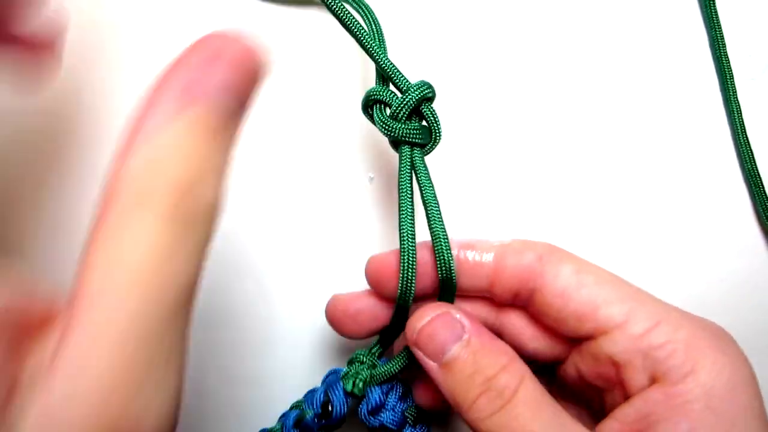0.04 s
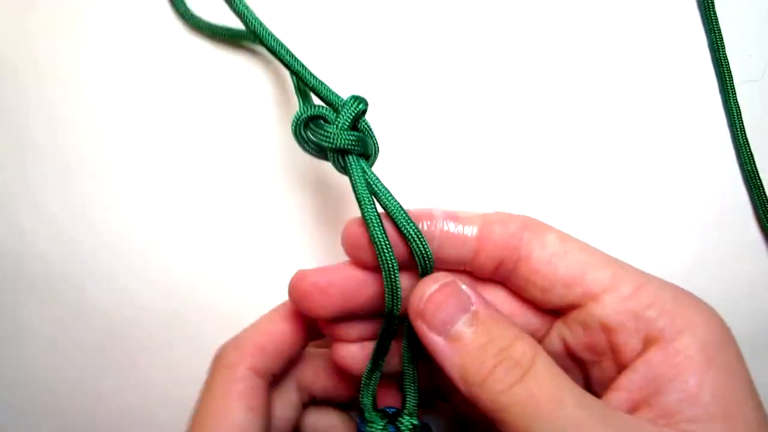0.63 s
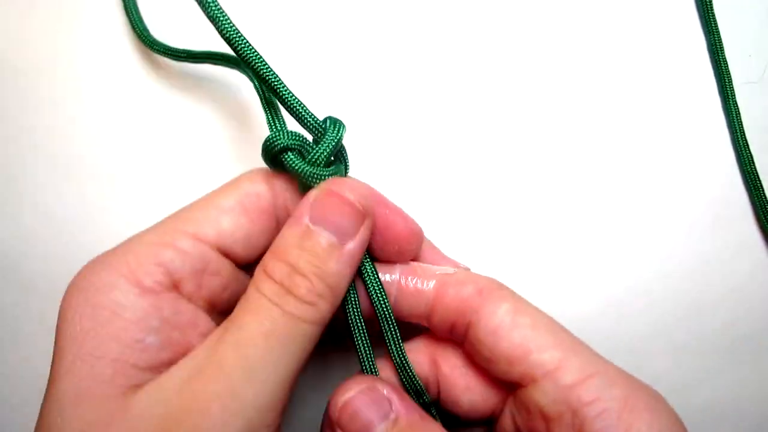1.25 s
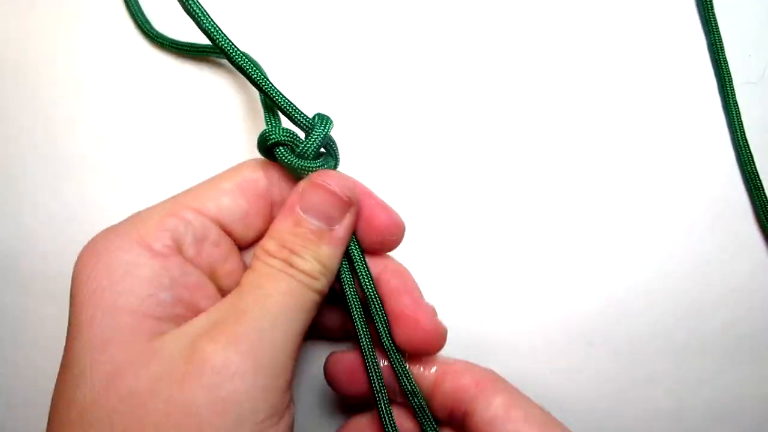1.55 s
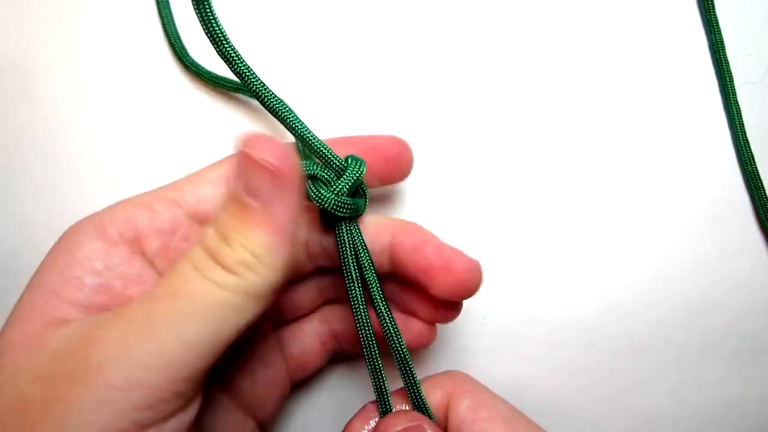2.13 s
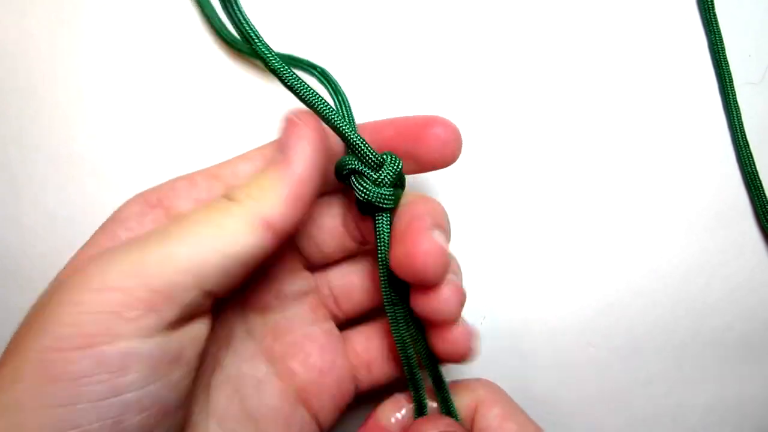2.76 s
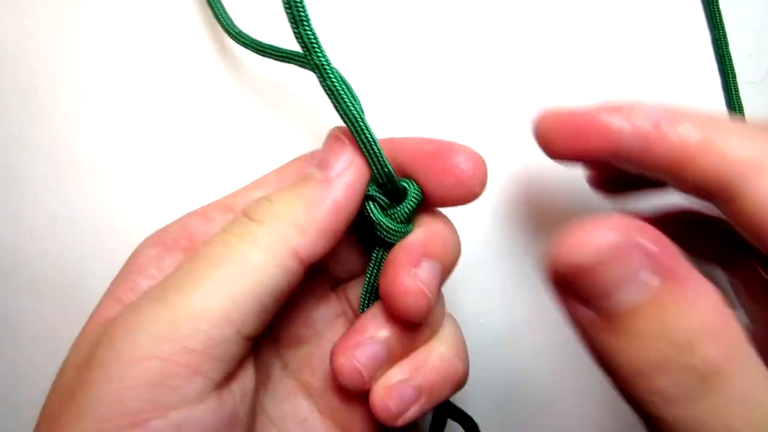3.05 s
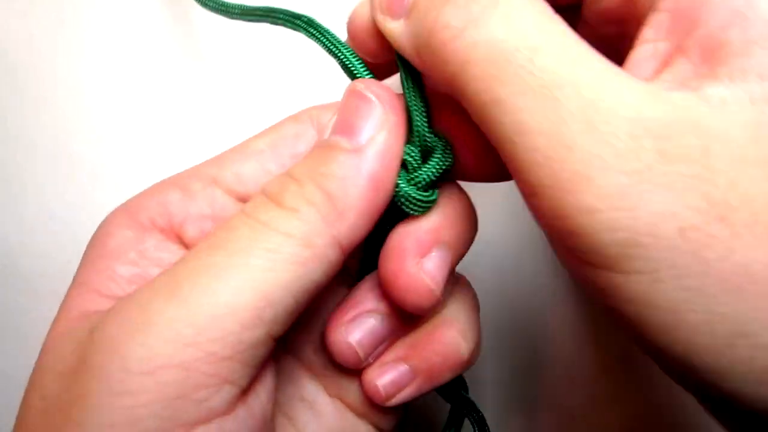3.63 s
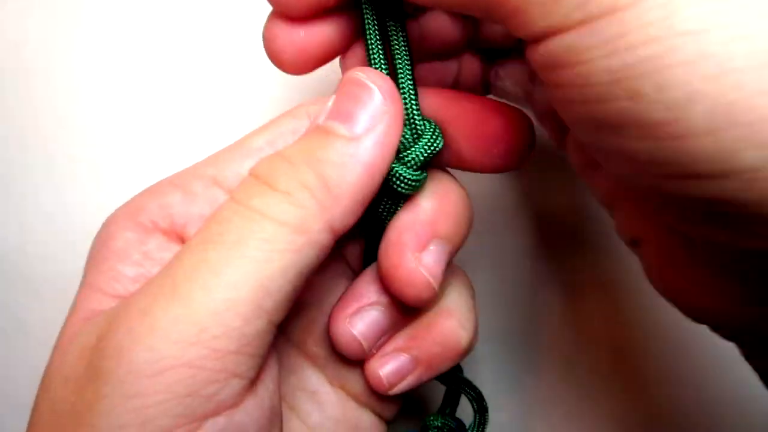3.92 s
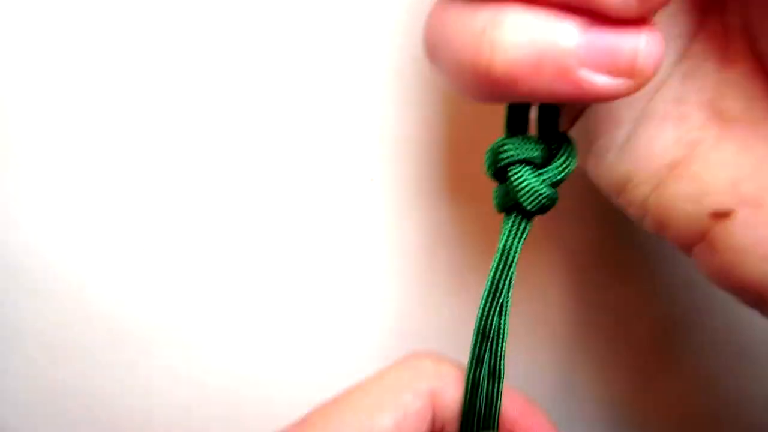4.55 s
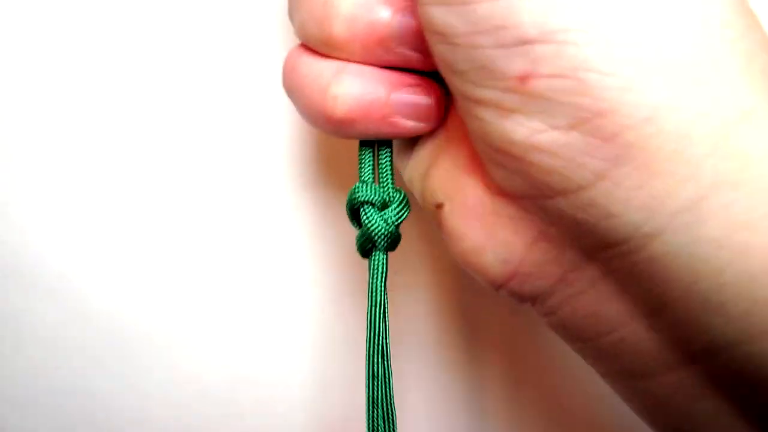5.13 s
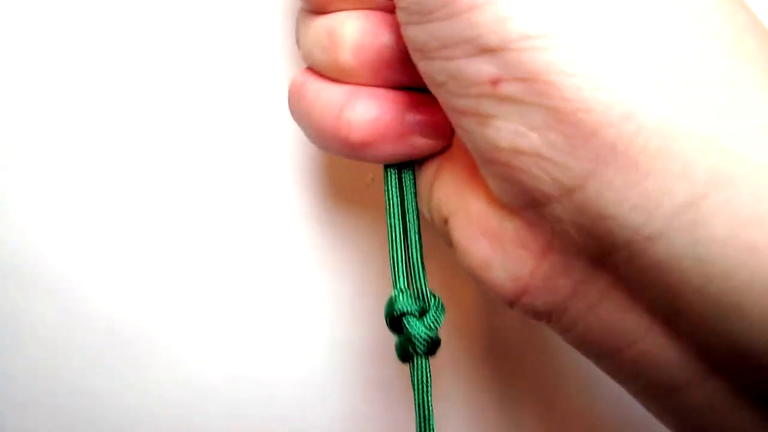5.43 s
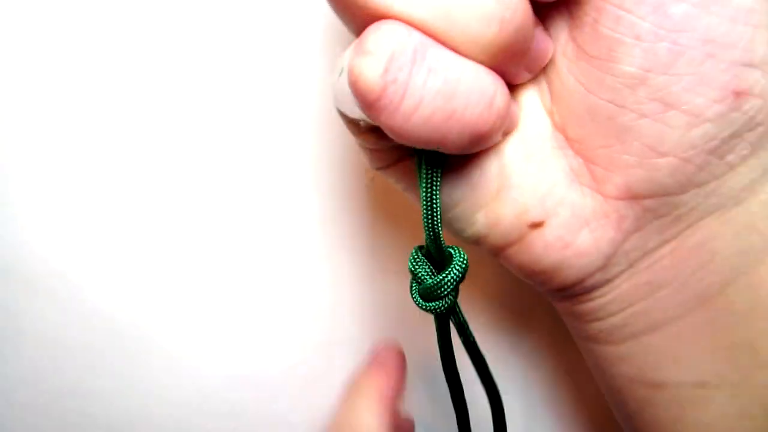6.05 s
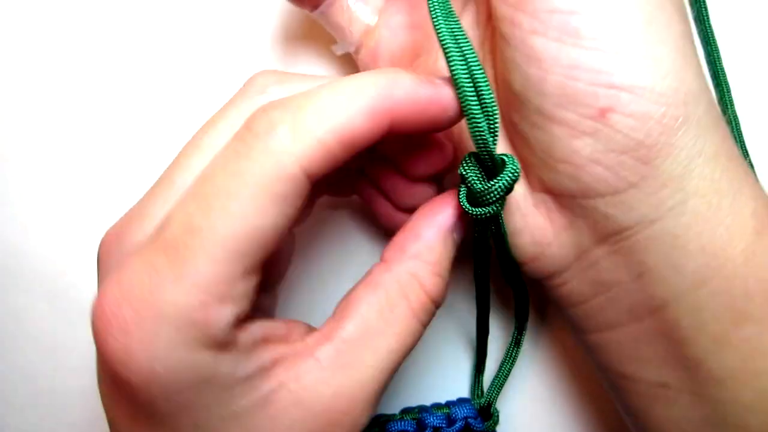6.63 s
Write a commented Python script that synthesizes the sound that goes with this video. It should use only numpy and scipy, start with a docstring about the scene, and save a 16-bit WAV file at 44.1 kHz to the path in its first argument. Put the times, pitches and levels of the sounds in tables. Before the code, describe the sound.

Close, scratchy rustles and small clicks as hands pull a cord knot tight, with a few dull knocks and a faint indoor hum.

```python
"""A dry, close rasp comes in short strokes: two hands draw nylon cord through a knot and pull it tight.
The braid's fibres catch and slip over skin and over each other, fingernails tick, and the taut cord
jumps in the knot with tiny plucks. The hands bump the desk, which knocks and rings, and shake the
stand of a small camera into a low shudder. Behind it a small room hums and a distant motor swells."""
import sys
import numpy as np
from scipy import signal
from scipy.fft import rfft, irfft
from scipy.io import wavfile
from scipy.ndimage import uniform_filter1d

SR = 44100
rng = np.random.default_rng(int(sys.argv[2]) if len(sys.argv) > 2 else 0)


def wav_record(signal):
    """Record a signal, one row per channel, as 16-bit PCM in the file named by sys.argv[1]."""
    frames = np.transpose(np.atleast_2d(signal))
    bounded = np.clip(frames, -1, 1)
    # unit amplitude maps onto the largest positive 16-bit level
    quanta = np.round(bounded * 32767).astype(np.int16)
    wavfile.write(sys.argv[1], SR, quanta)


N = 303404
TIME = np.arange(N) / SR
BINS = np.fft.rfftfreq(N, 1 / SR)


def amp(db):
    """Decibels to gain."""
    return 10 ** (np.asarray(db) / 20)


def unit(x):
    """Scales to rms 1."""
    return x / np.sqrt(np.mean(x ** 2) + 1e-20)


def curve_db(points, hz):
    """Reads an EQ curve on a log-frequency axis."""
    point_hz, db = np.transpose(points)
    return np.interp(np.log(hz + 1), np.log(point_hz), db)


def colour(x, gain):
    """Filters with one gain for each frequency bin."""
    return irfft(rfft(x) * gain, N)


def noise(gain):
    """White noise through an EQ."""
    return colour(rng.standard_normal(N), gain)


def band(lo_hz, hi_hz):
    """Band-pass gain with soft edges."""
    return 1 / np.sqrt((1 + (lo_hz / (BINS + 1)) ** 12) * (1 + (BINS / hi_hz) ** 12))


def wander(hz):
    """Smooth random modulation, rms 1, up to about hz changes a second."""
    return unit(noise(np.exp(-(BINS / hz) ** 2)))


def add(mix, start_s, sound):
    """Mixes a sound in at start_s, or at zero if that is negative."""
    part = mix[max(round(start_s * SR), 0):][:len(sound)]
    part += sound[:len(part)]


def reflections(x, t60):
    """A small furnished room: sparse echoes of random sign that die quickly."""
    t = np.arange(SR // 3) / SR
    taps = rng.standard_normal(len(t)) * (rng.random(len(t)) < .06)
    taps *= (t > .002) * amp(-60 * t / t60)
    return signal.fftconvolve(x, taps / np.linalg.norm(taps))[:N]


# EQ of the room tone: (frequency [Hz], relative level [dB])
AIR_EQ = [(18, -44), (30, 1.5), (44, -13), (130, -11), (182, -23.5), (230, -27.5), (270, -25), (369, -29.5),
          (505, -34.5), (622, -37.5), (897, -33), (1330, -34), (1870, -44), (7460, -48), (15500, -52.5)]


def room_air(level_db=-61):
    """Bass-heavy room air and microphone hiss; the level is that of the part above 300 Hz."""
    air = noise(amp(curve_db(AIR_EQ, BINS)) * BINS / np.hypot(BINS, 15))
    return amp(level_db) * air / np.std(colour(air, band(300, 15500)))


def tone(hz, drift_hz=0.477, waver_db=2.0):
    """A sine that wavers a little in pitch and level."""
    phase = 2 * np.pi * np.cumsum(hz + drift_hz * wander(1.77)) / SR
    return np.sqrt(2) * np.sin(phase) * amp(waver_db * wander(2.84))


# partials of the hum: (frequency [Hz], level [dB])
HUM_TONES = [(53.8, -48), (119, -57), (211, -68), (226.1, -62.5), (360.7, -73.5), (570.6, -77.5),
             (672.9, -80), (899, -77)]


def appliance_hum():
    """An appliance lays a steady bed of low tones."""
    return sum(amp(db) * tone(hz) for hz, db in HUM_TONES)


# partials of the motor: (frequency [Hz], relative level [dB], mid fade-in [s], mid fade-out [s])
MOTOR_TONES = [(82.4, -42.5, 1.8, 5.64), (112.4, -48, 2.2, 8), (143.8, -52.5, 3.2, 8), (64.6, -46, 6.1, 8),
               (158, -56, 5.7, 8)]


def motor_drone(start_db=-20.5, rise_db_per_s=3, fade_s=0.86):
    """A distant motor: its tones fade in one by one and the drone grows louder."""
    drone = np.zeros(N)
    for hz, db, start, end in MOTOR_TONES:
        fade = np.clip(np.minimum(TIME - start, end - TIME) / fade_s + .5, 0, 1)
        drone += amp(db) * tone(hz) * fade
    return drone * amp(start_db + rise_db_per_s * TIME)


def traffic_swell(level_db=-61, band_hz=(270, 430), fade_in_s=(5.5, 6.2)):
    """Near the end a soft, diffuse low-mid swell rises, as of traffic passing outside."""
    return amp(level_db) * unit(noise(band(*band_hz))) * np.interp(TIME, fade_in_s, [0, 1])


# the stand's slow sway, then its quick shudder: (frequency [Hz], half-width [Hz])
STAND_MODES = [(12.44, 4.77), (27.8, 5)]
# hands leaning on the desk rock the stand: (time [s], length [s], sway [dB], shudder [dB])
NUDGES = [(0.378, 0.034, -27, -22), (0.587, 0.046, -49, -31), (1.015, 0.21, -49, -43.5),
          (1.487, 0.15, -50, -34), (2.494, 0.2, -34, -32), (2.698, 0.32, -24.5, -43.5),
          (3.25, 0.34, -33, -58), (4.586, 0.39, -35, -44), (5.117, 0.19, -27, -26), (5.31, 0.23, -21, -41),
          (5.82, 0.26, -27.5, -28.5)]


def camera_stand(rise_s=0.041, decay_s=0.086, lifted_s=(3.2, 5.1)):
    """The stand trembles on two low resonances; each nudge builds up, holds and dies away."""
    resting_db, lifted_trim_db = (-38, -43), (-3, -5.5)  # (sway, shudder): calmer with hands lifted
    lifted = uniform_filter1d(1. * ((TIME > lifted_s[0]) & (TIME < lifted_s[1])), SR // 10)
    out = np.zeros(N)
    for mode, (hz, width) in enumerate(STAND_MODES):
        power = amp(resting_db[mode] + lifted_trim_db[mode] * lifted) ** 2
        for start, length, *mode_db in NUDGES:
            attack = np.clip((TIME - start) / rise_s, 0, 1)
            release = np.exp(-np.maximum(TIME - start - length, 0) / decay_s)
            power += (amp(mode_db[mode]) * attack * release) ** 2
        rocking = signal.hilbert(noise(1 / (1 + ((BINS - hz) / width) ** 4)))
        energy = abs(rocking) ** 2
        levelled = rocking.real / np.sqrt(energy + 0.09 * energy.mean())  # the nudges set the dynamics
        out += np.sqrt(power) * unit(levelled)
    return out


# resonances of the desk top: (frequency [Hz], relative level [dB], t60 [s])
DESK_MODES = [(72, -16.5, 0.87), (95.7, 2, 0.11), (127.1, 4, 0.11), (153, 3.5, 0.13), (218.4, 8, 0.031),
              (263.6, -2.5, 0.056), (407, -9, 0.061), (500, -13.5, 0.051), (607, -22.5, 0.13),
              (854, -20.5, 0.11), (1305, -4.5, 0.024), (2380, -20, .02)]
# hands bumping the desk: (time [s], peak level [dB], contact time [ms])
BUMPS = [(.128, -28.5, 5.4), (0.254, -28.5, 0.89), (0.3647, -19.5, 0.23), (0.489, -29, 0.65),
         (0.66, -39, 1.8), (0.934, -27, 4), (1.071, -27.5, 8.2), (1.366, -29.5, 3.7), (2.778, -32, 2.3),
         (5.127, -20, 11.7), (5.833, -15, 0.72), (5.852, -23, 8.9), (6.1847, -16, 0.2),
         (6.2048, -21.5, 0.26), (6.2138, -15, 0.32), (6.235, -18.5, 0.23), (6.243, -33, 2.9)]


def desk_bumps(push_gain=2.37, push_s=0.00029, rattle_db=-15, rattle_s=0.012, bloom_s=0.0046):
    """A blow pushes the desk top and rings its modes; soft flesh stays longer and sounds duller."""
    out, t = np.zeros(N), np.arange(SR // 3) / SR
    push = push_gain * np.exp(-t / push_s)
    for start, db, contact_ms in BUMPS:
        ring = sum(amp(level - 60 * t / t60) * np.sin(2 * np.pi * hz * rng.normal(1, .02) * t)
                   for hz, level, t60 in DESK_MODES)
        ring *= 1 - np.exp(-t / bloom_s)
        rattle = amp(rattle_db) * rng.standard_normal(len(t)) * np.exp(-t / rattle_s)
        contact = 1000 * t / contact_ms
        force = contact * np.exp(-2 * contact)
        knock = signal.fftconvolve(ring + rattle + push, force)[:len(t)]
        add(out, start, amp(db) * knock / abs(knock).max())
    return out


# plucks in the knot: (time [s], pitch [Hz], peak level [dB], rise and decay time [s])
PLUCKS = [(2.411, 1400, -35, 0.00061), (4.526, 1380, -30.5, 0.0012), (5.133, 1395, -46, 0.0027),
          (5.266, 1200, -34, 0.0009)]


def knot_plucks():
    """The taut cord jumps in the knot and gives a tiny pitched pluck."""
    out, t = np.zeros(N), np.arange(SR // 20) / SR
    for start, hz, db, ring_s in PLUCKS:
        envelope = t / ring_s * np.exp(1 - t / ring_s)
        add(out, start, amp(db) * envelope * np.sin(2 * np.pi * hz * t))
    return out


# EQ of the braid, for its ticks and its rasp: (frequency [Hz], relative level [dB])
BRAID_EQ = [(350, 1), (700, -5), (1050, 6), (1380, 5.5), (1750, 0.5), (2450, 2), (4400, -1), (5600, -2.5),
            (7200, -2), (8700, -2.5), (9700, -13), (12000, -12.5), (15800, -15.5)]
# nail ticks and cord snaps: (time [s], relative level [dB], decay [s], tilt [dB per octave])
TICKS = [(0.0255, -40.5, 0.0028, 6), (0.142, -37, 0.0047, 1), (0.363, -38, 0.0089, -7.5),
         (0.656, -56, .004, -6), (1.38, -55, .003, 1), (1.993, -49, 0.01, -2.5), (2.1805, -36.5, 0.002, 7),
         (2.2817, -41, 0.0021, 2), (2.411, -35.5, 0.0036, 2.5), (2.689, -44, .002, 7),
         (2.869, -46.5, 0.01, -4.5), (3.0048, -39.5, 0.0021, 11), (3.43, -48, 0.0067, 4),
         (4.34, -39, 0.005, 9), (4.389, -51, 0.0055, -8), (4.407, -39.5, 0.011, -2.5),
         (4.4863, -42, .008, 10), (4.503, -35, 0.0057, 7), (4.9505, -37, 0.0074, 2),
         (5.129, -43.5, 0.02, -5), (5.2685, -39, 0.011, -10), (5.462, -46, 0.006, -4),
         (5.692, -31.5, 0.0027, -4.5), (5.8306, -31, 0.0053, 2), (5.8712, -35, 0.011, -22),
         (6.204, -26, 0.01, -12), (6.2134, -28.5, 0.0058, -5), (6.6362, -41, 0.0024, 2),
         (6.7, -45, 0.0072, 4)]


def nail_ticks(trim_db=-3.5):
    """A nail or a strand lets go: a burst that dies in milliseconds, coloured like the braid."""
    out, t = np.zeros(N), np.arange(4096) / SR
    hz = np.fft.rfftfreq(len(t), 1 / SR)
    octaves, low_cut = np.log2((hz + 200) / 4000), hz / (hz + 300)
    for start, db, decay_s, tilt_db in TICKS:
        spectrum = amp(curve_db(BRAID_EQ, hz) + tilt_db * octaves) * low_cut
        burst = unit(irfft(spectrum * np.exp(2j * np.pi * rng.random(len(hz)))))
        add(out, start, amp(db + trim_db) * burst * np.exp(-t / decay_s))
    return out


def fibre_slips(per_s=7000, spread_db=-0.5, clump_db=2.03, clump_hz=130, noise_gain=0.71):
    """Fibres catch and let go thousands of times a second, in clumps as the weave passes."""
    size = amp(spread_db * np.minimum(rng.exponential(1, N), 4))
    snaps = size * rng.choice([-1, 1], N) * (rng.random(N) < per_s / SR)
    friction = unit(snaps) + noise_gain * rng.standard_normal(N)
    return unit(friction * amp(clump_db * wander(clump_hz)))


def close_echo(delay_ms=1.053, gain=0.2):
    """Comb filter: one very short reflection ripples the spectrum about every kilohertz."""
    return 1 - gain * np.exp(-2j * np.pi * BINS * delay_ms / 1000)


def finger_hollow(x, strokes, log_width=.075, overtone=0.17, patch_db=2.0, patch_hz=150, patch_s=0.013):
    """The hollow between the fingers rings with its octave; shifting contact mottles the spectrum."""
    hz, t, frames = signal.stft(x, SR, nperseg=512, noverlap=384)
    start, length, peak, *_, hollow_hz, boost_db = np.transpose(strokes)
    peak_s = start + peak * length  # the hollow takes a new shape for each stroke
    ratio = (hz[:, None] + 1) / np.interp(t, peak_s, hollow_hz)
    ring = 1 / (1 + (np.log(ratio) / log_width) ** 2)  # flesh damps it: a broad peak
    ring += overtone / (1 + (np.log(ratio / 2) / log_width) ** 2)
    patches = rng.standard_normal(frames.shape)
    for axis, steps in enumerate([patch_hz / hz[1], patch_s / t[1]]):
        blur = np.expand_dims(signal.windows.gaussian(101, steps), 1 - axis)
        patches = signal.fftconvolve(patches, blur, "same", axes=axis)
    gain = amp(ring * np.interp(t, peak_s, boost_db) + patch_db * unit(patches))
    mids = (hz > 2000) & (hz < 6000)
    gain[mids] /= np.sqrt(np.mean(gain[mids] ** 2, axis=0))  # the ring gathers energy and adds none
    return signal.istft(frames * gain, SR, nperseg=512, noverlap=384)[1][:N]


def cord_speed(length_s, peak, spill):
    """Speed arches from 0 to 1 and back, overhanging each end of the stroke by the share spill."""
    progress = np.arange(-spill * length_s, (1 + spill) * length_s, 1 / SR) / length_s
    ramp = np.interp(progress, [-spill, np.clip(peak, .05, .95), 1 + spill], [0, 1, 0])
    return np.sin(np.pi / 2 * ramp)


# rubs and slides of the cord: (time [s], length [s], peak position [0-1], relative level [dB],
# grip rasp [dB], slide sheen [dB], finger hollow pitch [Hz], hollow emphasis [dB])
STROKES = [ (0.0, 0.1, 0, -57, 2, -27, 4700, 7), (.062, 0.13, 0.18, -48.5, -12, -18.5, 4600, 4),
           (.215, 0.065, 0.53, -48.5, -7.5, -9.5, 4900, -1), (0.255, .08, 0.58, -54.5, -7, -6, 4900, 5),
           (0.412, 0.044, 0.82, -61.5, 7, -0.5, 3830, -1), (0.548, 0.054, 0, -62, 7.5, -14, 3000, -2),
           (0.644, 0.051, 0.49, -46.5, -6, -16.5, 3000, -4), (0.695, 0.16, 0.06, -66, 6, -11, 2970, -5),
           (0.888, 0.17, 0.39, -63.5, -4, -3.5, 3720, 0), (1.005, 0.26, 0.22, -63.5, 5.5, -2, 2500, 7),
           (1.25, 0.049, 0.48, -54.5, 1, -17, 2400, 0), (1.297, 0.062, 0.23, -51, -6, -17, 2950, 6),
           (1.341, 0.069, 0.66, -47, 1, -9, 3630, 4), (1.412, 0.15, 0.14, -64.5, -1, -2, 3770, -1),
           (1.644, .11, 0, -57.5, 6, -19, 2500, 15), (1.896, 0.098, 0.54, -61, 4, -5, 4300, 4),
           (1.993, 0.053, 0, -53.5, -0.5, -16, 3200, -7), (2.039, 0.077, 0.41, -47, -3.5, -19, 3150, 4),
           (2.08, 0.21, 0.52, -57.5, 1.5, -16.5, 2320, 10), (2.299, .11, 0.37, -53, -4, -18.5, 4200, 0),
           (2.36, .12, 0.72, -49, 1.5, -23, 4300, 1), (2.494, 0.039, 0.52, -57.5, 4, -30, 2400, 5),
           (2.769, 0.096, 0.64, -61.5, -19, -9, 4340, 14), (2.906, 0.067, 0.74, -49, -2, -16, 4270, 1),
           (3.058, 0.086, 0.65, -58.5, -5, -14.5, 4400, 14), (3.129, 0.056, 0.42, -58, 6.5, -26, 2260, 8),
           (3.25, 0.11, 0.21, -61, 4.5, -18, 4570, -3), (3.37, 0.096, 0.68, -54, 1, -21.5, 2130, 14),
           (3.485, 0.21, 0.19, -62, 4, -23, 4800, 1), (3.692, .18, 0, -57.5, -2, -18, 4900, 8),
           (3.911, 0.1, 0.48, -63, 4.5, -31, 3500, 12), (4.02, 0.057, 0.62, -61, -1, -11, 3500, -1),
           (4.131, .17, 0.3, -59, 0, -25, 3350, 7), (4.252, 0.17, 0.38, -65, 5, -8, 3350, 0),
           (4.386, 0.098, 0.29, -45.5, -4, -18.5, 2450, 10), (4.458, 0.084, 0.4, -41, -9.5, -9, 5200, 2),
           (4.515, 0.065, 0.45, -43, -7, -14.5, 4300, 16), (4.573, 0.066, 0.33, -45, -7, -13, 3250, 7),
           (4.623, 0.36, 0, -70, -.5, -11, 4330, 7), (4.952, 0.038, 0.12, -46, 2, -11, 4460, 9.5),
           (5.005, 0.14, 0.54, -62.5, -1, -20, 3620, 4), (5.177, 0.097, 0.5, -46, -5, -13, 4800, 10),
           (5.255, 0.1, 0.12, -51, -2.5, -12.5, 3000, -4), (5.446, 0.066, 0.74, -51.5, -2, -21.5, 2420, -5),
           (5.563, 0.13, 0.21, -67.5, 0, 0.5, 3000, -10), (5.858, .115, 0.24, -52, 2.5, -15, 2440, 7),
           (5.968, 0.22, 0.47, -52, 0, -9, 2620, 9), (6.134, 0.1, 0.8, -45.5, -9, -11, 3280, 6),
           (6.234, 0.042, .5, -45, -8, -22, 3280, 4), (6.259, 0.18, 0.39, -53, -1, -17.5, 2900, 0),
           (6.518, 0.33, 0.2, -60, 3, -8, 4820, 8), (6.8, .16, 0.58, -56.5, 7.5, -3.5, 4520, -2)]


def cord_strokes(rasp_db=-2.0, scratch_db=0.6, hiss_db=4.0, sheen_db=1.6, spill=0.1):
    """Each stroke is one swell of slips: a firm grip adds low rasp, a quick slide hiss and sheen."""
    braid = colour(fibre_slips(), amp(curve_db(BRAID_EQ, BINS)) * close_echo())
    rub = finger_hollow(braid, STROKES)
    zones = [band(400, 1900), band(1900, 6000), band(6000, 9500), band(9500, 16000)]
    powers = np.zeros((len(zones), N))
    for start, length, peak, db, grip_db, slide_db, _, _ in STROKES:
        speed = cord_speed(length, peak, spill)
        swell = amp(db) * speed ** 1.7  # the exponent makes the swell more pointed
        bright = speed ** 0.42  # the top end swells more steeply than the rasp
        rasp, scratch = amp(grip_db + rasp_db), amp(scratch_db)
        hiss, sheen = bright * amp(0.75 * slide_db + hiss_db), bright * amp(slide_db + sheen_db)
        for power, gain in zip(powers, [rasp, scratch, hiss, sheen]):
            add(power, start - spill * length, (swell * gain) ** 2)
    return sum(np.sqrt(power) * unit(colour(rub, zone ** 2)) for power, zone in zip(powers, zones))


def scene(wet_db=-13, width_db=-21, rumble_db=-66, hiss_db=-77):
    """Nearly mono: two microphone ports differ only in close reflections, faint rumble and hiss."""
    foley = cord_strokes() + nail_ticks() + knot_plucks() + desk_bumps()
    reverb = amp(wet_db) * reflections(foley, t60=0.31)
    ambience = room_air() + appliance_hum() + motor_drone() + traffic_swell()
    mid = foley + reverb + ambience + camera_stand()
    low_cut = BINS / np.hypot(BINS, 25)
    side = amp(width_db) * colour(reflections(mid, t60=0.066), low_cut)
    side += amp(rumble_db) * unit(noise(1 / (1 + (BINS / 90) ** 2)))
    return np.array([mid + side, mid - side]) + amp(hiss_db) * rng.standard_normal((2, N))


def record(dry):
    """A steep low-pass trims the very top."""
    low_pass = signal.firwin(511, cutoff=15850, window=("kaiser", 9), fs=SR)
    return signal.oaconvolve(dry, low_pass[None], "same", axes=1)


dry = scene()
out = record(dry)
wav_record(out)
```